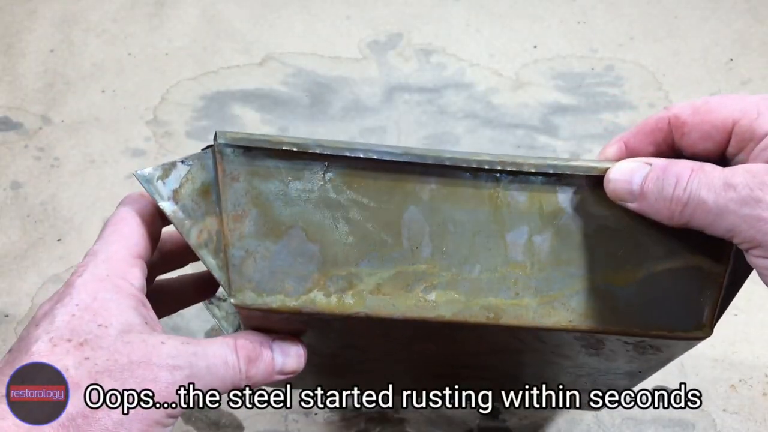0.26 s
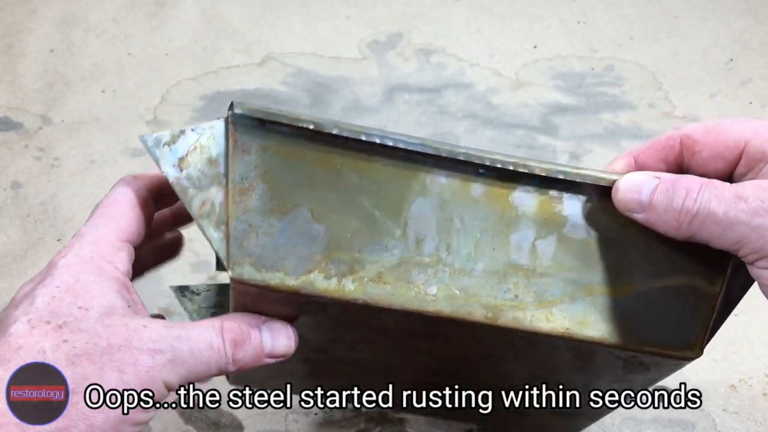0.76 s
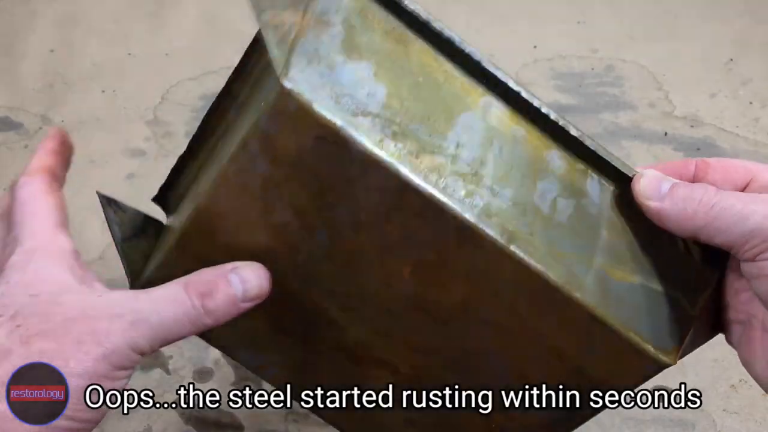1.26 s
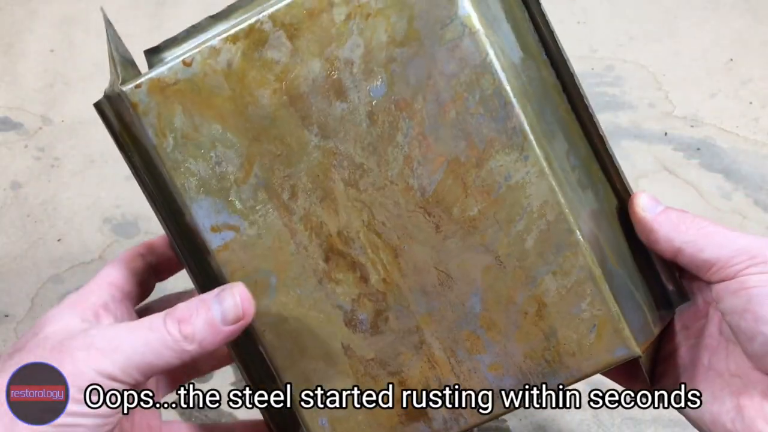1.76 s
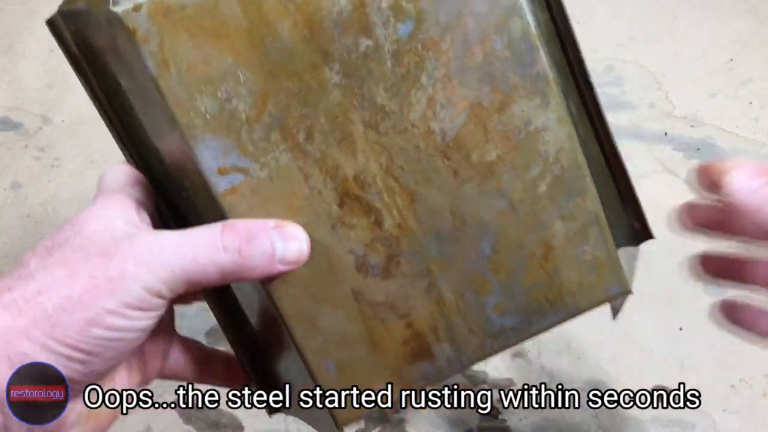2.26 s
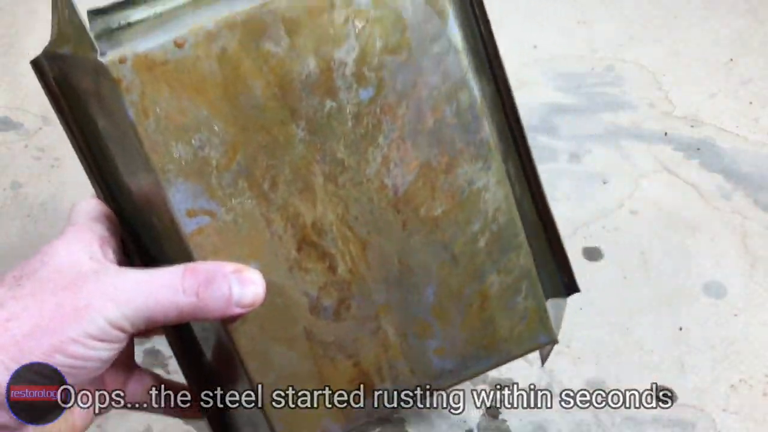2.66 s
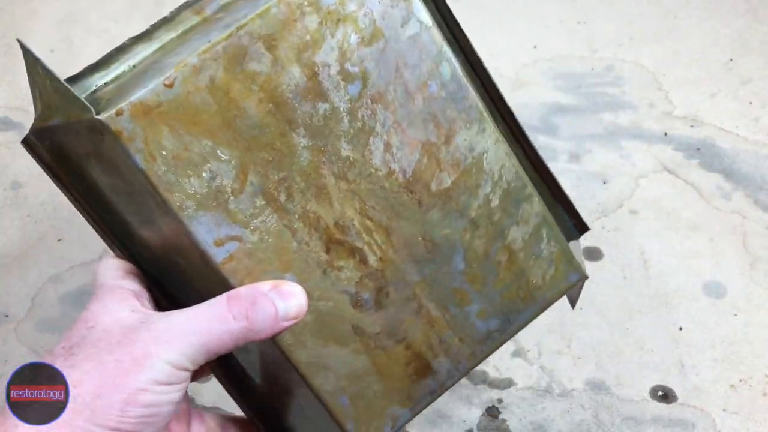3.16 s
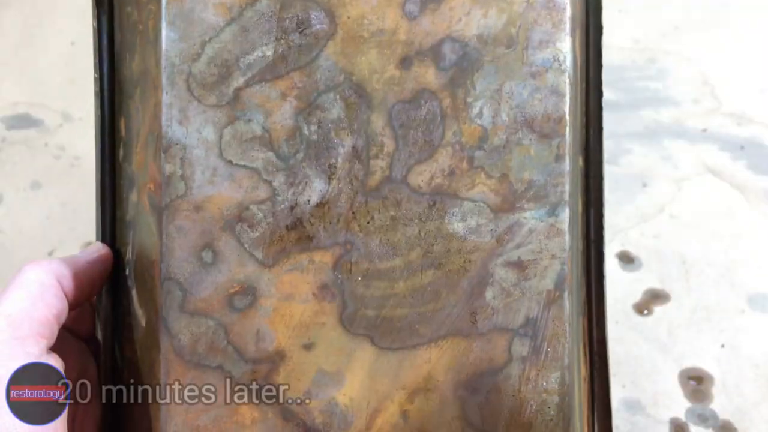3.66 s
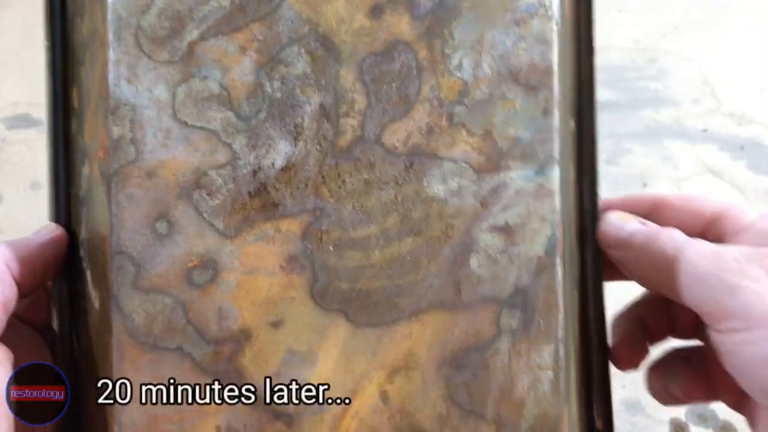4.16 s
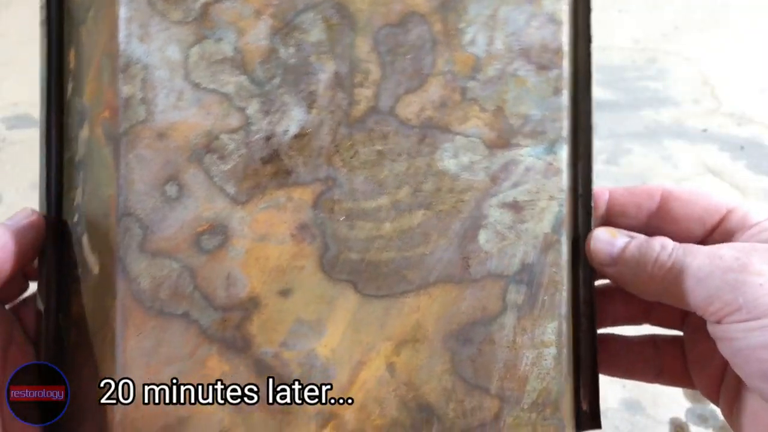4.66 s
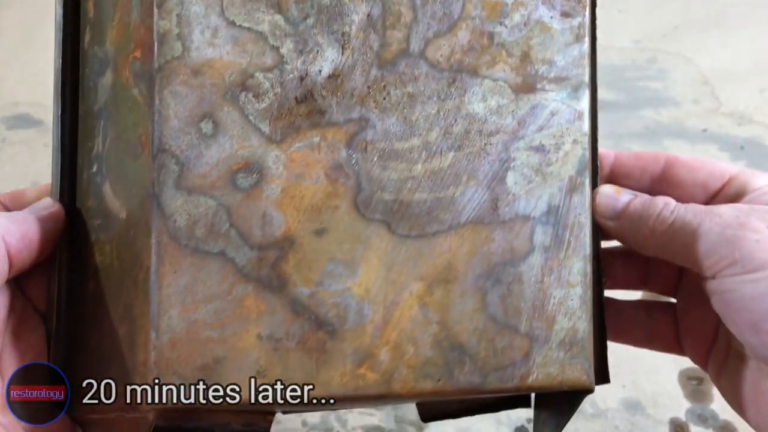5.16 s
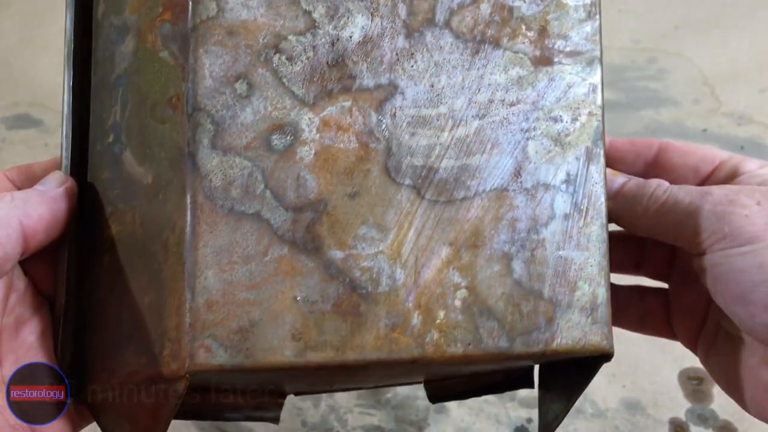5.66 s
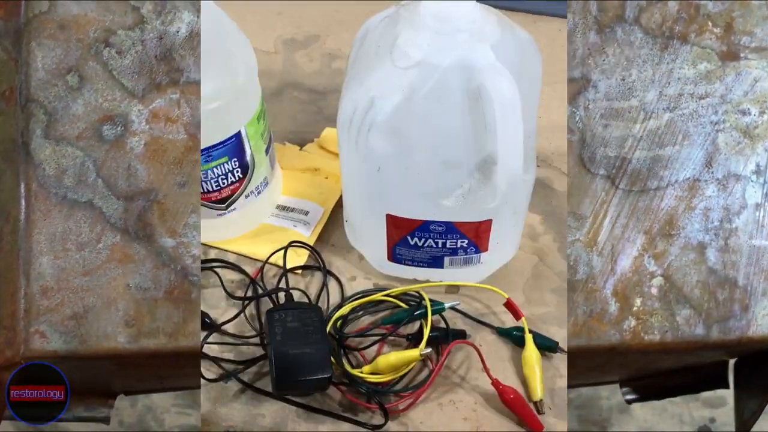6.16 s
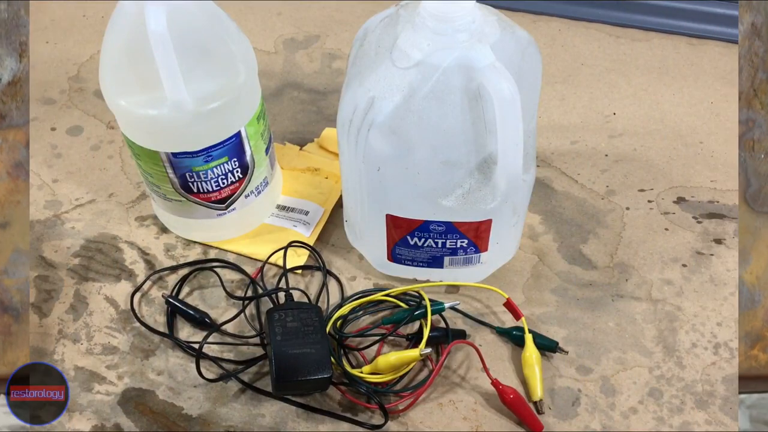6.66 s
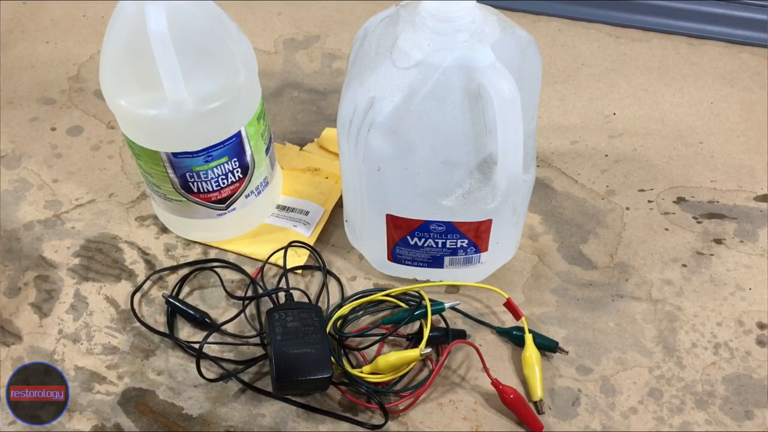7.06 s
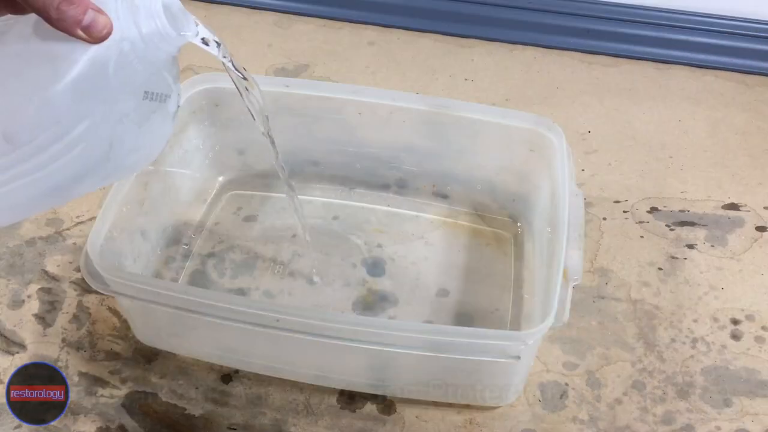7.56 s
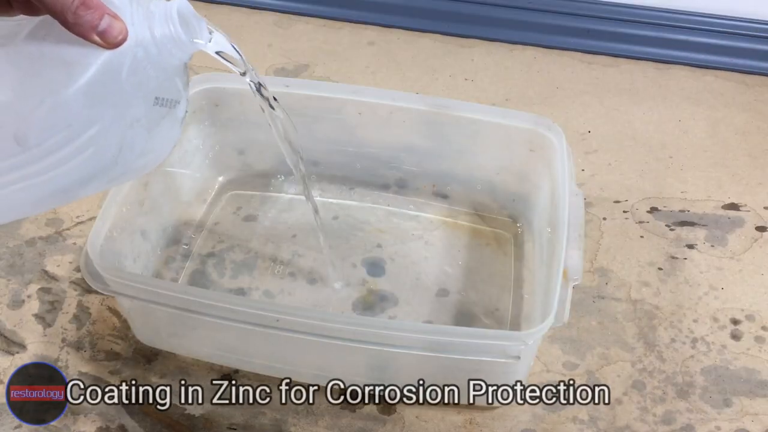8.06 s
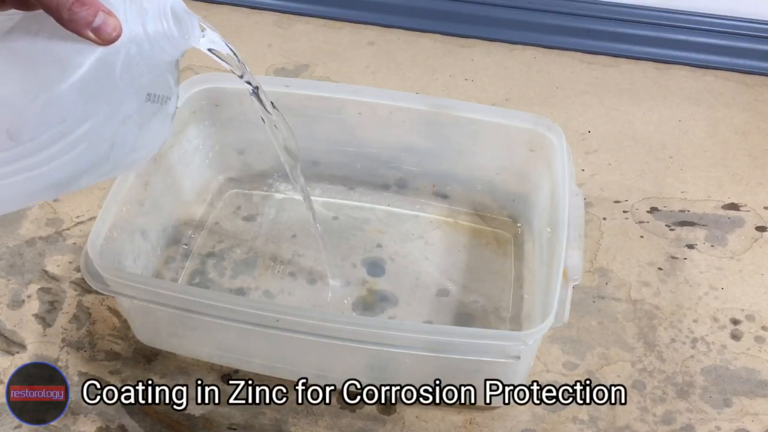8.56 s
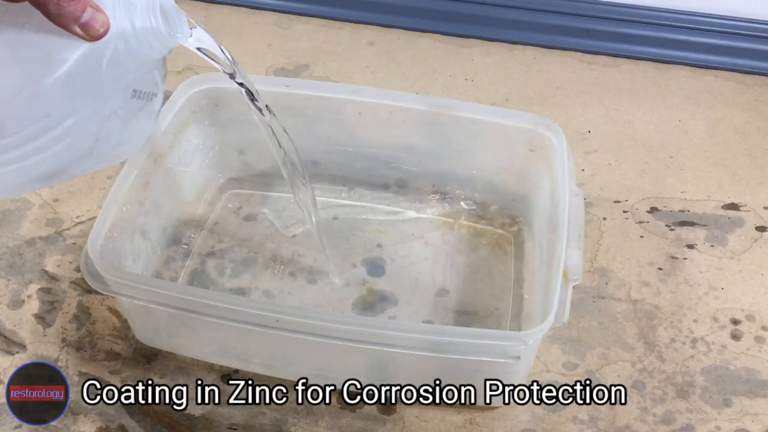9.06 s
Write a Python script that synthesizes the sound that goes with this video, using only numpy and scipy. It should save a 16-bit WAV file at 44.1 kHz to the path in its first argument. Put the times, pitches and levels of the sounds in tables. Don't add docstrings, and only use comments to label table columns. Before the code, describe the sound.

In a workshop yard, a big engine rumbles loudly and rises slowly in pitch over hiss and thin fan whine while hands quietly turn a steel pan. After skin scuffs, an abrupt cut leaves a softer distant idle. Fingers tap the pan with a short hollow ring and small ticks follow. The engine fades to near quiet, with a faint bird whistle, then water drips and bubbles into a plastic tub close to the microphone.

```python
import sys
import numpy as np
from scipy import signal
from scipy.io import wavfile
from scipy.ndimage import uniform_filter1d

SR = 44100
rng = np.random.default_rng(int(sys.argv[2]) if len(sys.argv) > 2 else 0)


def unload_audio(sound):
    columns = np.transpose(np.atleast_2d(sound))
    steps = np.round(np.clip(columns, -1, 1) * 32767)
    wavfile.write(sys.argv[1], SR, steps.astype(np.int16))


def convert_level_to_amplitude(level_db):
    exponent = np.asarray(level_db, float) / 20
    return 10 ** exponent


N = 410130

CUT_S = 3.4954
WIPE_S, WIPE_END_S = 5.98, 6.7


def evened(x):
    return x / np.sqrt(np.mean(x ** 2) + 1e-20)


def add(mix, s, sound):
    part = mix[round(s * SR):][:len(sound)]
    part += sound[:len(part)]


def leaving(s, over_s=.006):
    return np.clip(.5 - (np.arange(N) / SR - s) / over_s, 0, 1)


def per_scene(near_db, far_db, quiet_db, pour_db, lead_s=0):
    pour_s, fade_s = 7.44, 0.24
    rise_s = max(pour_s - fade_s / 2 - lead_s, WIPE_END_S)
    joins_s = [CUT_S, CUT_S, WIPE_S, WIPE_END_S, rise_s, pour_s + fade_s / 2]
    return np.interp(np.arange(N) / SR, joins_s, [near_db, far_db, far_db, quiet_db, quiet_db, pour_db])


def wander(top_hz, size, count=12):
    t = np.arange(0, size + 512, 256) / SR
    slow = 0
    for f in np.geomspace(top_hz / 10, top_hz, count):
        slow = slow + np.sin(2 * np.pi * (f * t + rng.random())) / np.sqrt(f)
    return np.interp(np.arange(size) / SR, t, evened(slow))


def resonate(x, hz, width_hz):
    r = np.exp(-np.pi * width_hz / SR)
    if np.ndim(hz) == 0:
        return 2 * signal.lfilter([1 - r], [1, -r * np.exp(2j * np.pi * hz / SR)], x).real
    turn = np.exp(2j * np.pi * np.cumsum(hz) / SR)
    return 2 * (turn * signal.lfilter([1 - r], [1, -r], x / turn)).real


def resonate_twice(x, hz, width_hz):
    return resonate(resonate(x, hz, width_hz), hz, width_hz)


def strokes(rows):
    out = np.zeros(N)
    for s, db, length_s, hz, width_hz in rows:
        t = np.arange(round(2 * length_s + 1) * SR // 2) / SR
        noise = rng.standard_normal((len(t), 2)).T
        grip = convert_level_to_amplitude(2.4 * evened(uniform_filter1d(noise[1], size=130)))
        rub = evened(grip * resonate_twice(noise[0], hz, width_hz))
        swell = np.sin(np.pi * np.clip(t / length_s, 0, 1) ** 0.58) ** 2
        add(out, s, convert_level_to_amplitude(db) * rub * swell)
    return out


def machines():
    # f/Hz, level/dB
    idle_tones = [(56, -18), (64, 0), (71.8, -7)]
    # f/Hz, width/Hz, level/dB in the near scene, level/dB later
    whine_tones = [(343, 4, 0, 9), (662, 33, -6, -11), (677, 12, -14, 0), (1023, 18, 1.5, -2),
                   (1258, 40, -14, -1), (1387, 50, -12, -8), (2042, 24, -6.5, -4), (3063, 55, -7, -27),
                   (4076, 22, -16.5, -26), (6780, 50, -23, -17), (8580, 40, -33, -20),
                   (13650, 60, -32, -45)]
    # t/s, level/dB
    squeal_levels = [(0, -66), (.4, -62), (.9, -72), (1.4, -76.5), (3.49, -79.5)]
    # t/s, gain/dB, width/s
    flares = [(.5, 2.5, 0.43), (2.6, 4, 0.17), (3.19, 6.5, 0.075), (3.47, 4, .06)]
    t = np.arange(N) / SR
    idle_db = per_scene(-28.5, -46, -52, -86) - 1.1 * t * (t < CUT_S)
    idle = np.zeros(N)
    for hz, db in idle_tones:
        idle += convert_level_to_amplitude(db + 1.2 * wander(1.2, N)) * np.sin(2 * np.pi * (hz * t + rng.random()))
    mains_db = per_scene(-56.5, -50, -57, -51)
    mains = convert_level_to_amplitude(1.2 * wander(2.2, N)) * np.sin(2 * np.pi * 120 * t)

    fan_db = per_scene(-60.5, -74.5, -76.5, -73)
    for s, db, width_s in flares:
        fan_db = fan_db + db * np.exp(-((t - s) / width_s) ** 2)
    air, whine = rng.standard_normal(N), np.zeros(N)
    for hz, width_hz, near_db, later_db in whine_tones:
        level = np.where(t < CUT_S, convert_level_to_amplitude(near_db), convert_level_to_amplitude(later_db))
        whine += level * evened(resonate_twice(air, hz, width_hz))

    squeal_db = np.interp(t, *np.transpose(squeal_levels))
    squeal = evened(resonate_twice(air, 6105, 30)) * leaving(CUT_S)
    hum = np.sqrt(2) * (convert_level_to_amplitude(idle_db) * idle + convert_level_to_amplitude(mains_db) * mains)
    return hum + convert_level_to_amplitude(fan_db) * whine + convert_level_to_amplitude(squeal_db) * squeal


def wash(colour, band_hz, count, size, patchy_db, flicker_db):
    hop, hz = size // 4, np.fft.rfftfreq(size, 1 / SR)
    frames = count // hop + 5
    a, b, patches = rng.standard_normal((frames, len(hz), 3)).T
    flicker = evened(uniform_filter1d(rng.standard_normal(frames), size=3))
    patches = uniform_filter1d(patches, size=10, axis=0)
    patches = evened(uniform_filter1d(patches, size=8, axis=1))
    f, db = np.transpose(colour)
    shape = convert_level_to_amplitude(np.interp(np.log(hz + 1), np.log(f), db, left=-90))
    in_band = (hz > band_hz[0]) & (hz < band_hz[1])
    inside = np.sqrt(np.sum(shape[in_band] ** 2) / np.sum(shape ** 2))
    z = (a + 1j * b) * shape[:, None] * convert_level_to_amplitude(patchy_db * patches + flicker_db * flicker)
    return evened(signal.istft(z, nperseg=size, noverlap=size - hop)[1][:count]) / inside


def yard():
    # f/Hz, density/dB per Hz
    roar_colours = [
        [(20, -6.5), (38, 4), (52, 3), (68, 18.5), (90, 12.5), (125, 14), (145, 0), (195, 11), (240, -3),
         (300, 0.5), (400, -3), (520, -12.5), (800, -51)],
        [(25, -14), (40, 15), (60, 12), (90, 8), (125, 9), (150, -3.5), (200, 8), (250, -3.5), (320, 9),
         (400, -3.5), (520, -10), (800, -44)],
        [(20, -21), (40, 19.5), (60, 18), (80, 13), (100, 8), (150, -2.5), (200, -1.5), (250, -3), (320, -1),
         (400, -6.5), (490, -11.5), (800, -40)],
    ]
    # f/Hz, density/dB per Hz
    hiss_colours = [
        [(250, -11), (500, -16.5), (600, -6), (1400, -8.5), (2600, -13.5), (4500, -15), (4900, -19),
         (6800, -20), (7400, -27.5), (9700, -29.5), (10400, -38), (13500, -39), (15600, -44)],
        [(250, 4), (500, -7), (600, -3.5), (1400, -6.5), (2600, -11.5), (4400, -18.5), (4900, -22.5),
         (7000, -23.5), (8600, -20.5), (9800, -25), (10400, -32.5), (13000, -32), (15600, -42)],
        [(250, -18), (500, -35), (600, -1.5), (1400, -4), (2600, -7), (4300, -12), (4900, -19), (7000, -21.5),
         (8600, -18), (9800, -21), (10400, -48), (13000, -33), (15600, -68)],
    ]
    roar_db = per_scene(-49, -56, -62, -56)
    hiss_db = per_scene(-54, -64, -70, -60.5, lead_s=0.34)
    first = leaving(CUT_S)
    second = leaving((WIPE_S + WIPE_END_S) / 2, WIPE_END_S - WIPE_S)
    out = np.zeros(N)
    for k, share in enumerate([first, second - first, 1 - second]):
        on = share > 0
        roar = wash(roar_colours[k], (230, 480), on.sum(), size=4096, patchy_db=1.2, flicker_db=.6)
        hiss = wash(hiss_colours[k], (1100, 9000), on.sum(), size=512, patchy_db=0.83, flicker_db=0.54)
        out[on] += np.sqrt(share[on]) * (convert_level_to_amplitude(roar_db[on]) * roar + convert_level_to_amplitude(hiss_db[on]) * hiss)
    return out


def bird():
    # t/s, f/Hz, level/dB
    strands = [
        [(6.38, 11100, -100), (6.45, 11350, -92), (6.56, 11850, -93), (6.72, 12150, -92), (6.86, 13100, -92),
         (6.98, 13350, -93), (7.12, 12900, -94), (7.17, 12100, -86), (7.195, 11100, -92)],
        [(6.74, 10100, -98), (6.83, 10950, -90), (6.88, 10850, -91), (6.92, 10250, -92), (7.03, 10500, -91),
         (7.1, 10800, -84), (7.14, 10800, -84), (7.18, 9800, -94)],
    ]
    out = np.zeros(N)
    for strand in strands:
        s, hz, db = np.transpose(strand)
        t = np.arange(s[0], s[-1], 1 / SR)
        pitch_hz = uniform_filter1d(np.interp(t, s, hz), size=1300)
        noise = rng.standard_normal(SR)[:len(t)]
        air = evened(resonate_twice(noise, pitch_hz, 110))
        add(out, s[0], convert_level_to_amplitude(np.interp(t, s, db)) * air)
    return out


def squeaks():
    # t/s, level/dB, length/s, f/Hz
    slips = [(3.065, -79, .07, 11750), (3.09, -81, .06, 12300), (3.13, -76, .085, 12050),
             (3.265, -75, .075, 12350), (3.225, -80, .03, 14300), (3.34, -80, .06, 11500),
             (4.55, -84, .07, 13900), (4.56, -85, .1, 13200), (4.705, -82, .04, 13400)]
    sag, width_hz = .065, 260
    out = np.zeros(N)
    for s, db, length_s, hz in slips:
        u = np.arange(0, length_s, 1 / SR) / length_s
        pitch_hz = hz * (1 - sag * u ** 2)
        noise = rng.standard_normal(SR // 2)[:len(u)]
        whistle = evened(resonate_twice(noise, pitch_hz, width_hz))
        add(out, s, convert_level_to_amplitude(db) * np.sin(np.pi * u) * whistle)
    return out


def pan():
    # f/Hz, level/dB, t60/s
    modes = [(334, -7.5, 0.087), (497, -3.5, 0.076), (635, -0.5, 0.08), (760, -14, 0.052), (977, -8, 0.13),
             (1090, -12, 0.12), (1544, -3.5, 0.054), (2000, -14.5, 0.07), (2750, -16, 0.07),
             (2890, -14, 0.08), (3250, -17, .05), (3680, -15, 0.05), (4100, -23, .04)]
    # t/s, level/dB
    taps = [(4.2715, -39), (4.283, -41), (4.303, -49), (4.348, -59), (4.372, -50)]
    # t/s, level/dB
    ticks = [(4.114, -49), (5.3817, -44.5), (6.3506, -41.5)]
    # f/Hz, width/Hz
    rim_modes = [(2700, 240), (3800, 560)]
    # t/s, level/dB, length/s, f/Hz, width/Hz
    rubs = [(1.0, -77.5, 2.1, 12800, 5000), (1.78, -71, 0.094, 11960, 5000),
            (2.817, -52, 0.088, 3280, 1500), (2.818, -58.5, .071, 9450, 7000),
            (3.245, -53, 0.032, 1500, 900), (3.31, -55, 0.058, 1610, 1090), (3.414, -39, 0.05, 1350, 380),
            (3.39, -47.5, .11, 1500, 1100), (3.412, -47.5, .04, 1800, 260), (3.444, -48, 0.03, 1150, 500),
            (3.468, -47.5, .022, 1100, 400), (3.455, -52.5, .035, 2100, 900),
            (3.38, -53.5, .12, 2200, 1500), (3.39, -67, 0.12, 11150, 9000), (3.452, -57, .02, 7000, 9000),
            (4.27, -53, 0.042, 2500, 3500), (4.296, -58, .03, 2300, 2500), (3.39, -57.5, .09, 3800, 2500),
            (6.72, -83, 0.63, 10300, 3500), (4.625, -75, .04, 10500, 5000), (4.268, -48, 0.091, 600, 804),
            (4.35, -52, 0.15, 480, 400), (4.335, -57, .05, 1000, 200), (4.345, -63, 0.08, 2800, 2500),
            (4.56, -68, 0.07, 6000, 6000), (4.45, -66.5, 0.45, 3000, 2500), (4.71, -68, .06, 7000, 6000)]
    spread = .02
    out, t = strokes(rubs), np.arange(SR // 4) / SR
    for s, db in taps:
        ring = np.zeros(len(t))
        for hz, mode_db, t60_s in modes:
            level = convert_level_to_amplitude(mode_db + 2 * rng.standard_normal() - 60 * t / t60_s)
            ring += level * np.sin(2 * np.pi * hz * rng.uniform(1 - spread, 1 + spread) * t)
        add(out, s, convert_level_to_amplitude(db) * ring)
    t = t[:300]
    for s, db in ticks:
        click = (t == 0) + 0.27 * rng.standard_normal(300) * convert_level_to_amplitude(-60 * t / 0.011)
        snap = 0.03 * click + sum(resonate(click, hz, width_hz) for hz, width_hz in rim_modes)
        add(out, s, convert_level_to_amplitude(db) * snap / abs(snap).max())
    return out


def pouring():
    # t/s, level/dB, f/Hz, t60/s, splash/0-1
    bubbles = [(7.6262, -44, 2090, .01, .8), (7.6475, -40, 2200, 0.013, .8),
               (7.9054, -43, 1400, 0.013, 0.95), (8.0505, -42, 4000, 0.01, .1),
               (8.0568, -34, 1780, 0.016, .12), (8.0818, -37, 2580, 0.016, 0.3),
               (8.0855, -39, 2330, .02, .1), (8.086, -44.5, 2790, .06, 0.74),
               (8.1622, -28.5, 4550, .008, 0.1), (8.904, -31, 3340, 0.014, 0.13),
               (9.1048, -39, 3850, 0.0087, 0.15), (9.1222, -37.5, 1380, 0.075, 0.06),
               (9.2135, -46, 1900, 0.045, 0.45), (9.208, -50, 1300, .015, .6),
               (9.2575, -37, 4950, 0.01, 0.1), (9.2597, -38.5, 5000, 0.028, .5),
               (9.159, -52, 5600, .015, .2), (9.266, -44, 2480, .025, .4), (9.258, -47, 2710, .03, .8),
               (9.239, -54, 3780, .06, 0.3)]
    # t/s, level/dB, f/Hz, width/Hz
    drops = [(7.5622, -34, 12600, 3500), (7.561, -38.5, 9750, 2500), (7.7293, -52, 12640, 3000),
             (7.7469, -49, 11100, 5000), (7.788, -50.5, 13000, 3000), (7.8007, -37.5, 12900, 2200),
             (7.9082, -40, 14000, 5000), (7.918, -43, 12700, 1400), (7.926, -45.5, 11960, 2200),
             (7.951, -48.5, 14200, 3000), (8.0496, -53.5, 10000, 8000), (8.0676, -49.5, 12300, 3000),
             (8.081, -52, 7050, 3000), (8.162, -41, 5500, 1500), (8.1935, -43.5, 7400, 700),
             (8.321, -51, 8820, 2500), (8.3654, -50.5, 12800, 3500), (8.7522, -51.5, 13000, 3500),
             (8.8547, -47.5, 10170, 4000), (8.923, -44, 9800, 2200), (9.0875, -34, 12600, 4000),
             (9.106, -42, 9600, 6013), (9.133, -48, 14000, 3000), (9.118, -48, 8560, 1500),
             (9.193, -46, 10000, 7000), (9.2112, -48, 5600, 1500), (9.2245, -43, 6500, 6000),
             (9.087, -44, 6000, 4000), (7.665, -54, 5600, 1200), (7.8255, -55, 11500, 4000),
             (7.768, -54, 14500, 2000), (8.0815, -47, 4200, 2500), (9.259, -49, 6900, 1200),
             (9.2637, -44.5, 13300, 2520), (9.283, -47, 10030, 2500), (9.2135, -53, 13000, 4000),
             (9.218, -52, 12300, 1500), (9.205, -54, 14800, 1500), (9.1235, -51, 6800, 1000),
             (9.22, -53, 8600, 1200), (8.215, -54, 6900, 1500), (9.274, -55, 13000, 4000)]
    # t/s, level/dB, length/s, f/Hz, width/Hz
    slops = [(7.62, -50, 0.3, 265, 280), (8.58, -42.5, 0.066, 308, 10), (8.97, -52, 0.062, 260, 34),
             (7.561, -60, .04, 12000, 4000), (7.57, -67, .05, 9000, 2000), (7.72, -70, .12, 13900, 4000),
             (7.8, -62.5, .045, 12500, 2500), (7.9, -65, .05, 13500, 4000), (9.2, -61, 0.055, 4000, 4000),
             (9.25, -55.5, 0.065, 4200, 4000), (9.085, -66, .04, 12000, 5000), (9.2, -69, .1, 13000, 5000)]
    rise, settle_s = 210, .022
    spray_width, swell_cycles = .18, 1.5
    fizz, fizz_t60_s, wide_snap = 0.22, 0.011, .04
    wet, t = np.zeros(N), np.arange(3000) / SR
    for s, db, hz, t60_s, splash in bubbles:
        pitch_hz = hz * (1 + rise * t60_s * t / (1 + t / settle_s))
        spray = evened(resonate_twice(rng.standard_normal(3000), pitch_hz, spray_width * hz))
        tone = np.sin(2 * np.pi * np.cumsum(pitch_hz) / SR)
        ring = (1 - splash) * tone + 1.12 * splash * spray
        onset = np.minimum(t * hz / swell_cycles, 1)
        add(wet, s, convert_level_to_amplitude(db - 60 * t / max(t60_s, .004)) * onset * ring)
    for s, db, hz, width_hz in drops:
        snap = (t == 0) + fizz * rng.standard_normal(3000) * convert_level_to_amplitude(-60 * t / fizz_t60_s)
        burst = resonate_twice(snap, hz, width_hz) + wide_snap * np.diff(snap, prepend=0)
        add(wet, s, convert_level_to_amplitude(db) * burst / abs(burst).max())
    walls = rng.standard_normal(3000) * convert_level_to_amplitude(-60 * t / .11) * (t > .003)
    walls = convert_level_to_amplitude(-12) * walls / np.linalg.norm(walls)
    return wet + strokes(slops) + signal.oaconvolve(wet, walls)[:N]


def engine(cycle_hz, orders, ruled, fade_db):
    turns, size = np.cumsum(cycle_hz) / SR, len(cycle_hz)
    loose = [(k, db + 2.0 * wander(2.488, size) + fade_db) for k, db in orders]
    out = np.zeros(size)
    for k, db in ruled + loose:
        phase = 2 * np.pi * (round(k) * turns + rng.random()) + .15 * wander(1.525, size)
        out += np.sqrt(2) * convert_level_to_amplitude(db) * np.cos(phase)
    return out


def echoed(t, rows, fade_db):
    ruled = []
    for k, db, null_s, period_s, echo in rows:
        beat = abs(1 - echo * np.exp(2j * np.pi * (t - null_s) / period_s)) / (1 + echo)
        ruled.append((k, db + fade_db * round(k) / 15 + 20 * np.log10(beat)))
    return ruled


def far_engine():
    # order, level/dB
    orders = [(5, -64.1), (7, -63), (8, -62), (9, -48), (10, -50.4), (11, -47.9), (13, -49.1), (14, -48.7),
              (16, -53.2), (17, -60.8), (18, -65.8), (20, -66.5), (24, -68.8), (25, -67.1), (26, -60),
              (27, -65), (28, -65), (29, -68), (30, -64.5), (39, -66), (41, -66), (44, -61)]
    # order, peak level/dB, null t/s, null spacing/s, echo share/0-1
    echoes = [(6, -43.5, 4.2, 3.9, 0.4), (12, -38.5, 3.864, 0.923, 0.89), (15, -36.5, 4.32, 1.57, 0.3)]
    # t/s, gain/dB
    fade = [(3.5, -0.5), (5.9, 1.5), (6.5, -8.5), (7.0, -23), (7.4, -41)]
    t = np.arange(CUT_S, 7.5, 1 / SR)
    fade_db = np.interp(t, *np.transpose(fade))
    return engine(7.416 + 0 * t, orders, echoed(t, echoes, fade_db), fade_db)


def near_engine():
    # order, level/dB
    orders = [(10, -46), (11, -41), (16, -47), (17, -40), (19, -45.5), (20, -45.2), (21, -45.8),
              (22, -54.8), (23, -57.5), (24, -53.8), (25, -56.9), (26, -57.8), (27, -48.0), (28, -47.5),
              (29, -54.5), (30, -49.8), (31, -42.3), (32, -40), (33, -38), (34, -42), (35, -52.2),
              (36, -52.4), (47, -57), (48, -54), (49, -56), (51, -58), (60, -60)]
    # order, peak level/dB, null t/s, null spacing/s, echo share/0-1
    echoes = [(12, -16, 1.8, 3.4, 0.62), (13, -26, 0.1, 3.1, .85), (15, -18.5, -0.15, 3.2, 0.52),
              (18, -29.5, 0.1, 2.7, 0.5)]
    # order, level/dB before, level/dB after
    drawing = [(6, -51, -34), (9, -55, -30), (14, -41, -23.5)]
    level_s, draw_s = 1.65, .25
    t = np.arange(0, CUT_S + .01, 1 / SR)
    drawn = 1 / (1.0 + np.exp((level_s - t) / draw_s))
    ruled = echoed(t, echoes, .5 * (t - CUT_S / 2))
    ruled += [(k, before_db + (after_db - before_db) * drawn) for k, before_db, after_db in drawing]
    pipe_db = -1 + 3 * np.sin(np.pi * t / CUT_S) - 1.15 * t
    return engine(5.806 + .172 * t, orders, ruled, pipe_db)


def scene():
    duck_db, duck_s = -6.5, 0.075
    near, far = np.zeros((2, N))
    add(near, 0, near_engine())
    near *= convert_level_to_amplitude(duck_db * (1 - leaving(CUT_S - duck_s / 2, duck_s)))
    add(far, CUT_S, far_engine())
    engines = leaving(CUT_S) * near + (leaving(7.3, .3) - leaving(CUT_S)) * far
    t = np.arange(1000) / SR
    add(engines, CUT_S, -convert_level_to_amplitude(-26.5) * np.exp(-t / .0018))
    add(engines, 0, -convert_level_to_amplitude(-11) * np.exp(-t / .002))
    return (engines + machines() + yard() + pan() + pouring() + squeaks() + bird())[None]


def roll_off(x):
    return signal.sosfilt(signal.butter(12, 15630, fs=SR, output="sos"), x)


def record(dry):
    heard = signal.sosfilt(signal.butter(3, 33, "high", fs=SR, output="sos"), dry)
    treble_cut = signal.firwin(255, 15700, window=("kaiser", 9), fs=SR)
    heard = signal.oaconvolve(heard, treble_cut[None], "same")
    return roll_off(heard)


dry = scene()
out = record(dry)
unload_audio(out)
```